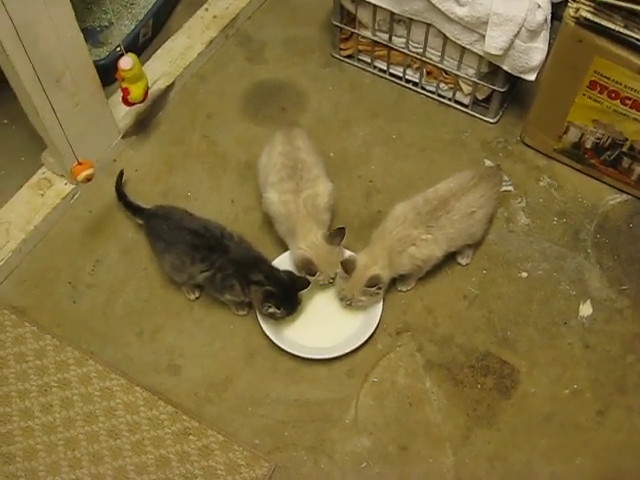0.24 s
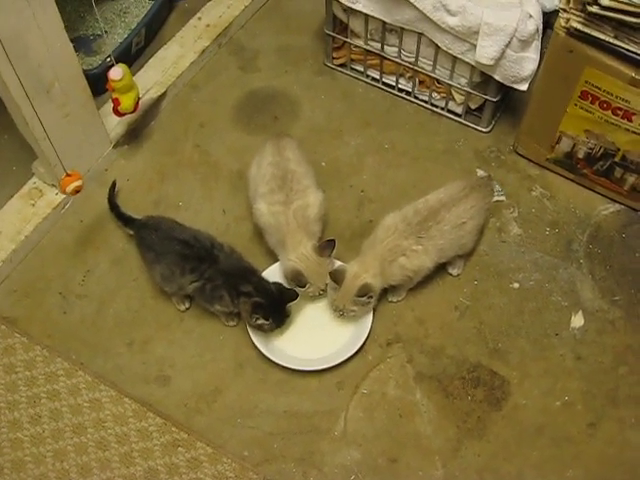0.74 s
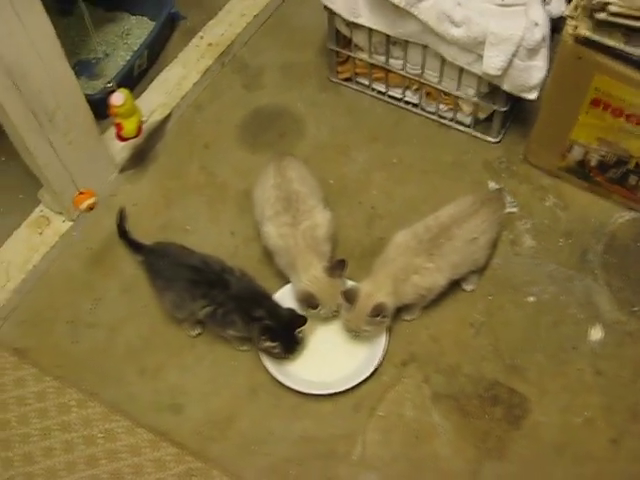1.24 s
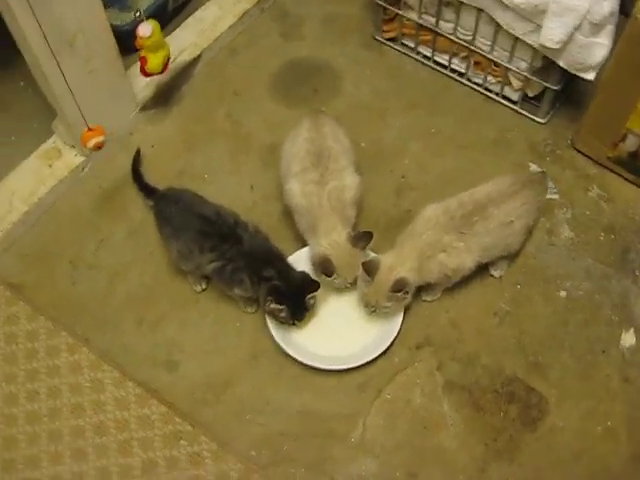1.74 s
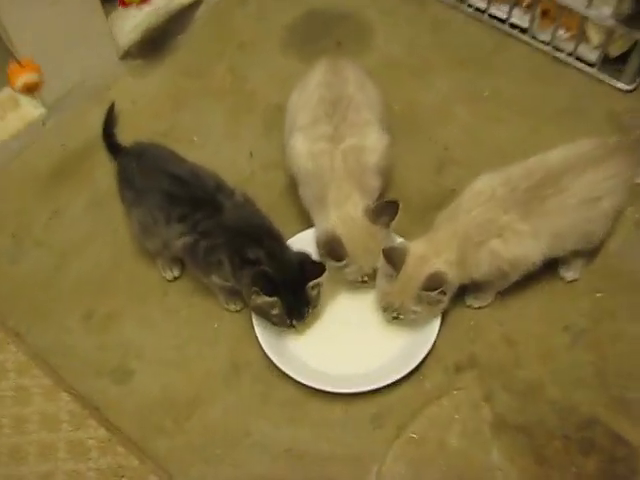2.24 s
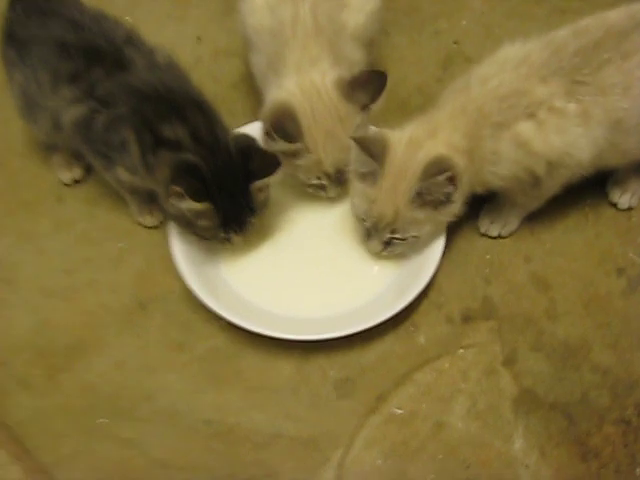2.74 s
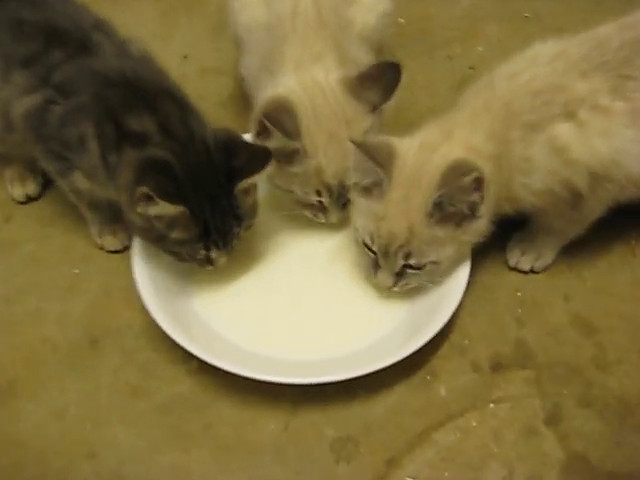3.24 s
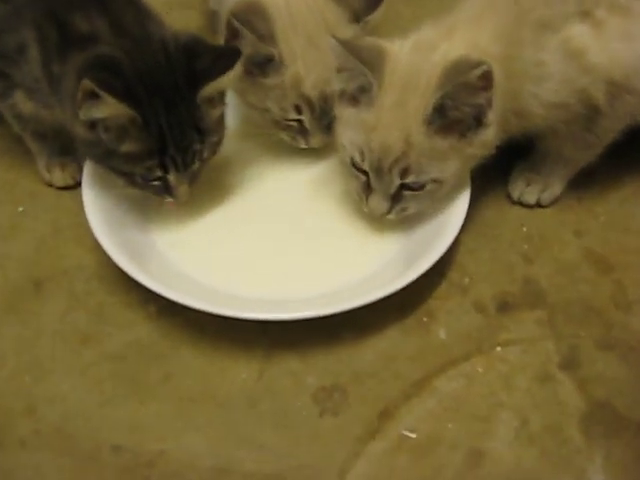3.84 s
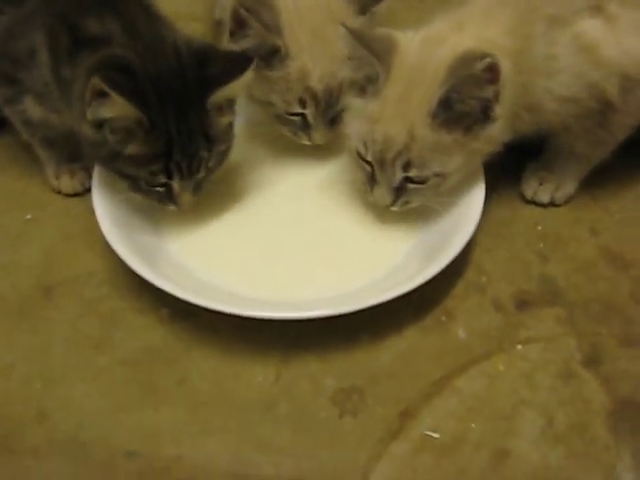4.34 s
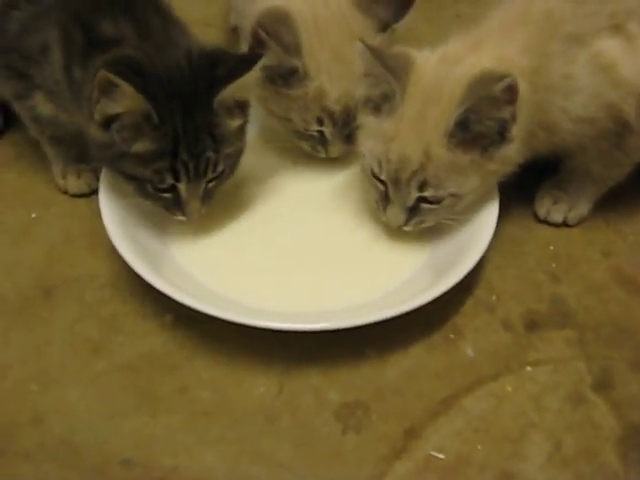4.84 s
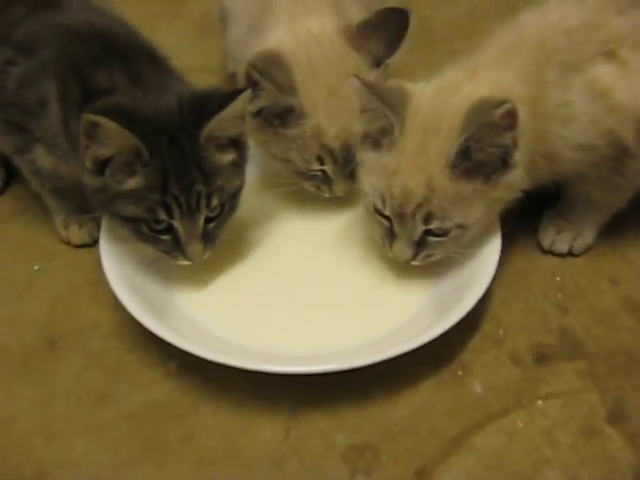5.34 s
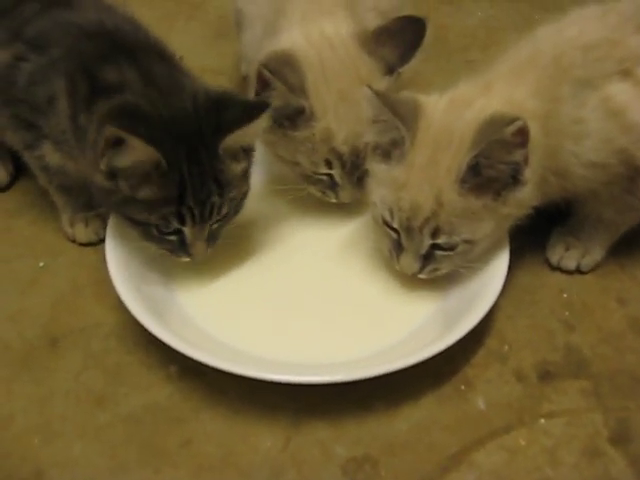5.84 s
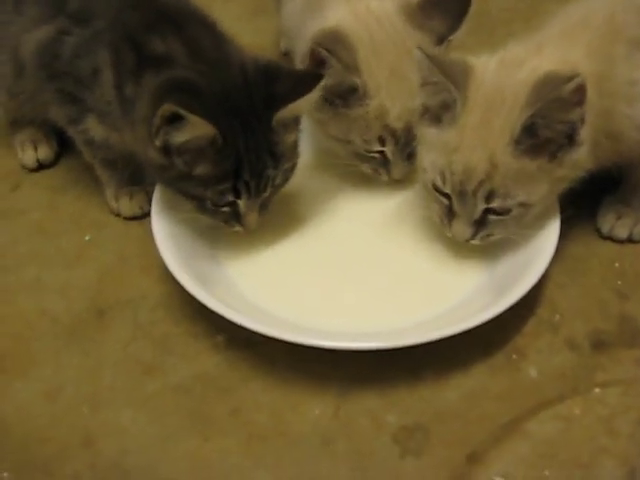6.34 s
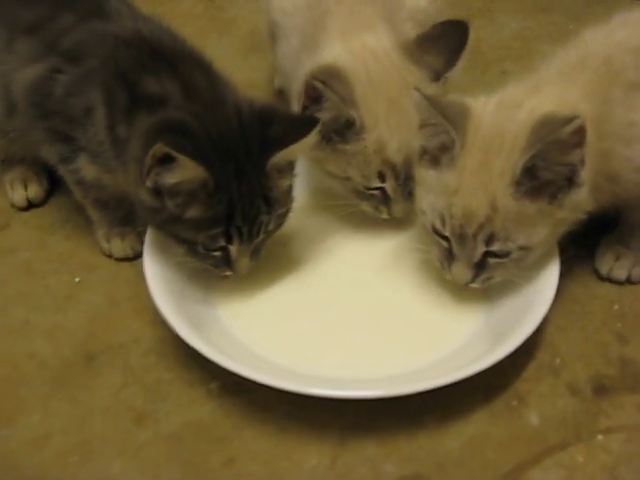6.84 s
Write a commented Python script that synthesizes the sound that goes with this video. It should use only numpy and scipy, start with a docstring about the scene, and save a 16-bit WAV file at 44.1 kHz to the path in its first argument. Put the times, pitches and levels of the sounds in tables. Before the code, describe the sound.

Kittens lap milk with quick, bright wet clicks and tiny plops, after a couple of seconds of nearby knocking, rubbing and scuffing in a quiet room.

```python
"""Three kittens lap milk from a plate on a concrete floor, their clear clicks starting after 2.3 s.
Each click snaps a film of milk and rings a pocket of air; squelches and bright ticks are runs of tiny pops.
Fine crackle swells from 2.1 to 3.3 s, then eases; soft plops follow its level.
In the first 2.5 s something nearby is knocked (noise bands and decaying modes) and rubbed (jerky noise).
A faint low sine dies away under the first knocks; filtered noise is the steady room hiss."""
import sys
import numpy as np
from scipy import signal
from scipy.fft import rfft, irfft
from scipy.io import wavfile
from scipy.ndimage import uniform_filter1d

SR = 44100
rng = np.random.default_rng(int(sys.argv[2]) if len(sys.argv) > 2 else 0)


def wrap_up_sound(samples):
    """Save the sound to the file named by the first command line argument, as 16-bit audio."""
    columns = np.atleast_2d(samples).T
    # keep every value between -1 and 1, then stretch to whole-number steps
    tamed = np.clip(columns, -1, 1)
    steps = np.round(tamed * 32767).astype(np.int16)
    wavfile.write(sys.argv[1], SR, steps)


N = 313110


def gain_of(db):
    """Decibels to gain."""
    return 10 ** (np.asarray(db) / 20)


def unit(x):
    """Scales to an energy of one."""
    return x / np.sqrt(np.sum(x ** 2) + 1e-20)


def read(points, hz):
    """Reads a (f/Hz, value) table on a log-frequency axis."""
    f_hz, value = np.transpose(points)
    return np.interp(np.log(hz + 1), np.log(f_hz + 1), value)


def curve(points):
    """A (t/s, value) table at every sample."""
    return np.interp(np.arange(N) / SR, *np.transpose(points))


def add(mix, s, sound):
    """Adds a sound into the mix at time s."""
    part = mix[max(round(s * SR), 0):][:len(sound)]
    part += sound[:len(part)]


def coloured(x, colour):
    """Filters by a table of (f/Hz, gain/dB)."""
    gain = gain_of(read(colour, np.fft.rfftfreq(N, 1 / SR)))
    return irfft(rfft(x) * gain, N)


def noise(colour):
    """Noise of rms one with the given spectrum."""
    return np.sqrt(N) * unit(coloured(rng.standard_normal(N), colour))


def decay_of(t, t60_s):
    """Exponential decay, 60 dB down at t60."""
    return np.exp(-np.log(1000) * t / t60_s)


def ring(hz, scale_ms, glide, size=512):
    """A pocket of air swells and rings for a few cycles, its pitch rising as it closes."""
    age = np.arange(size) / SR * 1000 / max(scale_ms, .05)
    pitch_hz = hz * (1 + glide * (np.tanh(age / 2) - .5))
    turns = np.cumsum(pitch_hz) / SR
    swell = age ** 2 * np.exp(-1.25 * age)
    return unit(swell * np.sin(2 * np.pi * (turns + rng.random())))


# room hiss colour: f/Hz, relative density/dB
HISS_COLOUR = [(15, -36), (25, -9), (134, -5.5), (236, -4), (363, -5), (394, -5.5), (607, -6.5),
               (1230, -8.5), (1520, -10), (1700, -8), (1840, -10), (3250, -12), (4370, -13), (12500, -22.5),
               (16000, -23.5)]


def room_hiss(level_db=-53):
    """Steady noise of the quiet room; the level is its rms."""
    return gain_of(level_db) * noise(HISS_COLOUR)


# dying low tone: t/s, f/Hz, rms level/dB
DRONE_PATH = [(0, 109, -52), (.05, 109, -49), (.12, 106, -60), (.18, 106, -53), (.3, 101, -75)]


def drone():
    """A faint low sine under the first knocks, gliding down as it dies away."""
    s, hz, db = np.transpose(DRONE_PATH)
    t = np.arange(N) / SR
    turns = np.cumsum(np.interp(t, s, hz)) / SR
    level = np.sqrt(2) * gain_of(np.interp(t, s, db)) * (t < s[-1])
    return level * np.sin(2 * np.pi * turns)


# rub swelling before the big knock, stirring again after it: t/s, level before trim/dB
RUB_LEVEL = [(0, -50.5), (.18, -46), (.29, -38.5), (.39, -44), (.5, -70), (.75, -51), (1.7, -76)]
# rub colour: f/Hz, relative density/dB
RUB_SPECTRUM = [(30, -31), (100, -13), (190, -15), (280, -5.5), (430, -12.5), (560, -3.5), (1150, -6),
                (1600, -15.5), (2500, -10.5), (3300, -20.5), (4100, -17.5), (5500, -23), (7000, -33),
                (15000, -43)]


def rub(grain_db=1.2, grain_s=0.0066, trim_db=-0.45):
    """Something slides, catching and letting go in small jerks."""
    grain = uniform_filter1d(rng.standard_normal(N), int(grain_s * SR))
    level_db = curve(RUB_LEVEL) + trim_db + grain_db * grain / grain.std()
    return gain_of(level_db) * noise(RUB_SPECTRUM)


# bands of a knock: lower edge/Hz, upper edge/Hz, t60/s, level re thump/dB
KNOCK_BANDS = [(84.4, 226, 0.22, 1), (297, 800, 0.23, -3), (720, 1780, 0.18, 1), (1860, 3470, 0.2, -6),
               (3840, 7600, 0.18, -18), (7660, 13000, 0.14, -40)]


def band_levels(ring_hz, clatter_db, treble_fall_db, thump_db, bass_fall_db=8.5):
    """Clatter falls per octave on both sides of its resonance; the thump fills in the bass."""
    lo, hi, _, share_db = np.transpose(KNOCK_BANDS)
    octaves = np.log2(np.sqrt(lo * hi) / ring_hz)
    fall_db = np.where(octaves > 0, treble_fall_db, bass_fall_db)
    hump_db = clatter_db - abs(octaves) * fall_db
    return 20 * np.log10(np.hypot(gain_of(hump_db), gain_of(thump_db + share_db)))


# knocks and scuffs: t/s, rise/ms, first contact re loudest band/dB, ring f/Hz,
# clatter before trim/dB, treble fall/(dB/octave), thump before trim/dB
KNOCK_EVENTS = [(.009, 0.56, -17, 5600, -10, 18, -14.5), (.073, 0.67, -10, 1230, 2, 11, -26),
                (.365, 0.62, -2, 2700, -15, 9, -26), (.399, 1.1, -5.5, 1060, 8.5, 10, 3),
                (.403, 2.3, -20, 635, 9, 20, -25), (.409, 3.2, -16, 4050, 3, 11.5, -10),
                (.646, 1.4, -22, 3400, -9, 7.5, -45), (.658, .7, -6, 3300, -18, 16, -34),
                (.783, 2.2, -16, 5800, 3, 24, -11.5), (.882, 1.8, -16, 3200, 1.5, 10.5, -27),
                (1.068, 0.71, 0, 1300, -36, 5, -27.5), (1.128, 1.6, -8, 2630, -15.5, 5, -24.5),
                (1.177, .9, 3, 3300, -20, 13, -34), (1.236, 3, -4, 3600, -15.5, 21, -43),
                (1.361, 0.41, -6.5, 3500, -13, 22, -27.5), (1.415, 3, -21, 1950, -1, 13, -25),
                (1.421, 3.5, -13, 1330, 1, 9.5, -13), (1.527, 3, -12, 1680, -11.5, 9.5, -29),
                (1.586, 2.9, -12, 4900, -10.5, 14, -48), (1.595, 1, -5, 4800, -15, 20, -49),
                (1.861, 1, -17, 3200, -19.5, 2, -47), (2.003, 3, -14, 6000, -23, 5, -31),
                (2.135, .6, 2.5, 3350, -20.5, 12, -42), (2.405, 0.36, -7, 3820, -10, 4.5, -26.5),
                (2.498, 1.3, -14, 3300, -12.5, 12, -52)]
# modes of the thing struck: f/Hz, relative level/dB, t60/s
STRUCK_MODES = [(86.4, -12, 0.7), (113.5, -14, 0.53), (146.8, -9, 0.355), (239.6, -4.5, 0.32),
                (285.6, 0.5, 0.17), (405, -32, 0.78), (545, 3.5, 0.086), (648, -2.5, 0.17), (686, -1, .15),
                (801, -1, 0.19), (1042, -0.5, 0.18), (1167, -1, 0.14), (1570, -7, 0.12), (1674, -15, 0.22)]


def knocks(modes_db=4, rattle_db=-2.0, ring_gain=1.13, ring_q=7, grain_db=3):
    """Sharp first contact, grainy clatter round one resonance, and low modes of the thing struck."""
    out, t = np.zeros(N), np.arange(SR * 3 // 4) / SR
    filters = [signal.butter(3, [lo, hi], "band", fs=SR, output="sos") for lo, hi, *_ in KNOCK_BANDS]
    grain_t = t[::100]
    for s, rise_ms, first_db, ring_hz, clatter_db, fall_db, thump_db in KNOCK_EVENTS:
        levels_db = band_levels(ring_hz, clatter_db, fall_db, thump_db)
        rise = 1 - np.exp(-t * 1000 / rise_ms)
        grain = np.interp(t, grain_t, rng.standard_normal(len(grain_t)))
        rattle = rng.standard_normal(len(t)) * gain_of(grain_db * grain)
        resonance = signal.lfilter(*signal.iirpeak(ring_hz, ring_q, fs=SR), rattle)
        rattle = rattle + ring_gain * resonance
        for k, (db, sos, (_, _, t60, _)) in enumerate(zip(levels_db, filters, KNOCK_BANDS)):
            # a different stretch of the rattle for each band
            shifted = np.roll(rattle, k * len(t) // len(KNOCK_BANDS))
            clatter = unit(signal.sosfilt(sos, shifted * rise * decay_of(t, t60)))
            add(out, s, gain_of(db + rattle_db) * clatter)
        # first contact: a very short swing at the resonance
        contact = ring(ring_hz, 210 / ring_hz, glide=0)
        add(out, s - .0005, gain_of(max(levels_db) + first_db) * contact)
        body = np.zeros(len(t))
        for hz, db, t60 in STRUCK_MODES:
            body += gain_of(db) * decay_of(t, t60) * np.sin(2 * np.pi * (hz * t + rng.random()))
        add(out, s, gain_of(thump_db + modes_db) * unit(body * rise))
    return out


# room decay: f/Hz, t60/s
ROOM_DECAY = [(200, 0.36), (1000, 0.16), (3500, 0.17), (7000, 0.074), (14000, 0.38)]


def room(x, floor_db=-19, tail_db=-9, onset_s=0.0064):
    """A few quick bounces off plate and floor, then a short diffuse tail."""
    t = np.arange(SR // 2) / SR
    hz, age, z = signal.stft(rng.standard_normal(len(t)), SR, nperseg=256)
    decay = decay_of(age, read(ROOM_DECAY, hz)[:, None])
    tail = signal.istft(z * decay, SR, nperseg=256)[1][:len(t)]
    response = gain_of(tail_db) * unit(tail * (1 - np.exp(-(t / onset_s) ** 2)))
    for s in rng.uniform(0.00094, .005, 4):
        add(response, s, gain_of([floor_db]) * rng.choice([-1, 1]))
    return x + signal.fftconvolve(x, response)[:N]


# mouth crackle, also steering the plops: t/s, base tick level/dB
CRACKLE_LEVEL = [(0, -41.5), (2.1, -43), (3.3, -34), (7.1, -37.5)]


def crackle(per_s=260, centre_hz=3800, octaves=0.692, spread_db=3.0, laps_per_s=3.4):
    """Fine ticks of three wet mouths, bunched on each kitten's own tongue rhythm."""
    out, level_db = np.zeros(N), curve(CRACKLE_LEVEL)
    duration_s = N / SR
    phases = rng.random(3)
    count = int(per_s * duration_s)
    for k, (when, scatter, pitch, size, damping) in enumerate(rng.random((count, 5))):
        kitten = k % 3
        rate = laps_per_s * (1 + .12 * (kitten - 1))
        stroke = np.floor(when * duration_s * rate) + phases[kitten]
        s = (stroke + .22 * rng.standard_normal()) / rate % duration_s
        # logistic pitch scatter, about bell-shaped in octaves
        bell = 0.588 * np.log(pitch / (1 - pitch))
        hz = np.clip(centre_hz * 2 ** (octaves * bell), 700, 10500)
        db = level_db[int(s * SR)] + spread_db * min(-np.log(size), 3.5)
        scale_ms = (0.15 + .3 * damping) * np.sqrt(centre_hz / hz)
        add(out, s, gain_of(db) * ring(hz, scale_ms, glide=0.37 * scatter))
    return out


def plops(per_s=30, centre_hz=900, level_db=-36, spread_db=2.0):
    """Tongues dipping into the milk open larger, softer pockets of air."""
    out = np.zeros(N)
    nearness_db = curve(CRACKLE_LEVEL) - np.max(np.transpose(CRACKLE_LEVEL)[1])
    for when, pitch, size, damping in rng.random((int(per_s * N / SR), 4)):
        db = level_db + nearness_db[int(when * N)] + spread_db * min(-np.log(size), 3)
        plop = ring(centre_hz * 2 ** (pitch - .5), 0.61 + .6 * damping, glide=0.18)
        add(out, when * N / SR, gain_of(db) * plop)
    return out


# wet squelches and brief bright ticks: t/s, dry energy/dB, centre f/Hz, length/ms
POP_RUNS = [(.353, -27, 10000, 1.9), (.366, -22, 9000, 4), (0.658, -15, 4410, 3.7), (1.594, -14, 5440, 5.5),
            (2.585, -28.5, 980, 12), (2.747, -24, 1130, 10), (2.863, -22.5, 1250, 18),
            (2.951, -10.5, 6000, 9), (3.86, -20, 3420, 24), (3.868, -26, 6550, 17),
            (3.8775, -9.5, 4450, 5.9), (5.5674, -5, 5020, 3.6), (5.745, -19, 4500, 12),
            (5.794, -25, 4080, 4), (5.9238, -21.5, 3040, 3), (6.3855, -17.5, 3200, 6),
            (6.929, -18, 3500, 9.9)]


def squelches_and_ticks(pops_per_ms=2.3, spread_octaves=0.63, spread_db=4):
    """Wet squelches and brief bright ticks: fast runs of tiny pops."""
    out = np.zeros(N)
    for s, db, hz, length_ms in POP_RUNS:
        run = np.zeros(SR // 20)
        count = int(length_ms * pops_per_ms) + 1
        for k, (late, pitch, size) in enumerate(rng.uniform(-1.2, 1, (count, 3))):
            at_s = (k + .5 * late) / pops_per_ms / 1000
            pop_hz = min(hz * 2 ** (spread_octaves * pitch), SR / 3)
            add(run, at_s, gain_of(spread_db * size) * ring(pop_hz, 1100 / hz, glide=0.11))
        add(out, s, gain_of(db) * unit(run))
    return out


def snap(hz, octaves, spread_ms, size=512):
    """A film of milk breaks: a very short spray of pressure with a broad hump of a spectrum."""
    age = np.arange(size) * 1000 / SR / spread_ms
    spray = rfft(rng.standard_normal(size) * age * np.exp(-age))
    offset = np.log2((np.fft.rfftfreq(size, 1 / SR) + 1) / hz)
    hump = np.exp(-.5 * (offset / octaves) ** 2)
    # the spray's own spectrum is half flattened
    flattened = spray / np.sqrt(np.abs(spray) + 1e-9)
    return unit(np.roll(irfft(hump * flattened), 10))


# clearest tongue clicks: t/s, dry ring energy/dB, air pocket f/Hz, dry snap energy/dB, snap centre f/Hz
TONGUE_CLICKS = [(2.3416, -24, 2360, -20.5, 2900.0), (2.438, -33, 5510.0, -21.5, 5440),
                 (2.4981, -15, 3010.0, -15.5, 4810), (2.509, -14, 2930.0, -23, 3000.0),
                 (2.587, -28, 1050.0, -30.0, 3000.0), (2.7124, -27, 2690.0, -21, 4430),
                 (2.7583, -23, 4920.0, -21.5, 3380), (2.8605, -18, 1720, -21, 1500.0),
                 (2.882, -23, 2950, -19.5, 4200.0), (2.9637, -19.0, 8990.0, -13.5, 4700.0),
                 (2.9986, -21.0, 2760.0, -35, 3100.0), (3.042, -26, 2700, -28.0, 3700.0),
                 (3.1096, -20, 4300, -29, 4200.0), (3.1275, -9.5, 3770, -15.0, 3100.0),
                 (3.1817, -27, 2990.0, -26.0, 3700.0), (3.229, -22.5, 2500.0, -33.0, 3300.0),
                 (3.2681, -10.5, 1890, -17, 2380), (3.2794, -30, 2610.0, -20, 3200.0),
                 (3.3032, -25, 3380.0, -22.0, 2900.0), (3.3137, -16.5, 2660, -15.5, 2400.0),
                 (3.3766, -14.5, 3830, -23.0, 4300.0), (3.4246, -16.5, 3000, -17, 3850),
                 (3.4448, -22, 3790.0, -21, 4300.0), (3.528, -12.5, 6950, -21.0, 5630),
                 (3.6517, -19, 5840.0, -23, 4100.0), (3.6798, -23, 5210.0, -25, 4170),
                 (3.7265, -19, 1450, -29, 1500.0), (3.741, -24, 3010.0, -23.0, 2100.0),
                 (3.8299, -27, 3730, -20.5, 3000.0), (3.867, -22.5, 3080, -20, 3630),
                 (3.92, -14, 3910, -34, 3800.0), (3.9742, -24.5, 1010.0, -40, 1700.0),
                 (3.9888, -14, 5300, -17.5, 4220), (4.0056, -23, 7140.0, -20, 4400.0),
                 (4.0605, -22.5, 2750, -22, 5500.0), (4.0917, -15.5, 3820, -18.5, 4670),
                 (4.1633, -13, 4700, -25, 4500.0), (4.1736, -28, 1960.0, -16.5, 1690),
                 (4.3361, -5.5, 4700, -13, 4600.0), (4.3987, -26, 1150, -22, 2500.0),
                 (4.448, -12.5, 1980, -14, 2510), (4.4841, -20, 3730, -16.5, 6460),
                 (4.655, -24, 3990.0, -25, 3300.0), (4.7268, -23, 3580.0, -22, 5800.0),
                 (4.8357, -23, 7250, -24, 6300.0), (4.8653, -21, 2580, -24, 4400.0),
                 (4.9142, -26.5, 1120.0, -26, 2000.0), (4.9185, -15.5, 5660, -20, 3980),
                 (4.9824, -17, 5510.0, -29, 5100.0), (4.9963, -17.5, 5060.0, -24, 6300.0),
                 (5.0459, -18.5, 6940.0, -36, 5800.0), (5.0998, -20, 4020.0, -28, 4100.0),
                 (5.1574, -15.0, 4510.0, -26, 4600.0), (5.168, -24, 9530.0, -23, 5100.0),
                 (5.177, -22, 6940.0, -14.5, 6600.0), (5.2005, -11.5, 5100, -16, 4800.0),
                 (5.2126, -18.5, 2690.0, -16.0, 4400.0), (5.2997, -21.5, 3010.0, -30.0, 2900.0),
                 (5.3123, -18, 4780.0, -17.5, 5100.0), (5.3291, -18.5, 3500, -20.5, 5800.0),
                 (5.412, -25.5, 920, -32, 3000.0), (5.415, -15.5, 4480, -27, 4000.0),
                 (5.4289, -24, 4640.0, -21, 4000.0), (5.4888, -25, 1860.0, -26.0, 3000.0),
                 (5.518, -15.5, 5960, -16.5, 5400.0), (5.5258, -13.5, 3040, -12, 4570),
                 (5.5761, -17, 3600, -29, 4900.0), (5.6717, -16.5, 5840.0, -19, 3900.0),
                 (5.754, -14.5, 4720, -13.5, 5160), (5.802, -12, 4100, -23, 4400.0),
                 (5.9268, -25, 8990.0, -16.5, 4800.0), (5.9951, -15.5, 4470, -16.5, 4470),
                 (6.0089, -26, 1180, -27, 2400.0), (6.107, -19, 4640.0, -26, 3700.0),
                 (6.1599, -20, 3900.0, -22.5, 4500.0), (6.2221, -30, 2090.0, -21.5, 3900.0),
                 (6.305, -20, 5840.0, -25, 2800.0), (6.315, -21.5, 4100, -30, 5100.0),
                 (6.3648, -24.0, 4020.0, -32, 3600.0), (6.3902, -14.5, 6940.0, -13, 4200.0),
                 (6.3981, -15.5, 3480, -22.0, 3500.0), (6.5044, -18.5, 5540, -21, 2900.0),
                 (6.576, -24.5, 3300, -23.5, 5200.0), (6.6093, -14, 5000, -20, 4400.0),
                 (6.7099, -14, 6250, -15.5, 4030), (6.8315, -9.5, 4080, -29, 3800.0),
                 (6.9689, -24.5, 1010.0, -31, 2100.0), (7.0598, -22.5, 4200, -21.5, 3600.0)]


def laps(ring_cycles=1.23, scatter_octaves=0.37, longest_ms=0.33, lead_db=-14.0, lead_s=0.001203,
         linger_db=-9.5, linger_ms=1.6, linger_hz=2050, linger_tilt_db=9,
         pop_db=-11.5, pop_octaves=0.51, pop_before_s=0.0059, pop_after_s=.011):
    """A soft weaker burst leads into each snap and the ring it starts, among three weaker pops."""
    out = np.zeros(N)
    chances = rng.uniform(-1, 1, (len(TONGUE_CLICKS), 7))
    for (s, ring_db, hz, snap_db, snap_hz), chance in zip(TONGUE_CLICKS, chances):
        cycles = ring_cycles * 2 ** (scatter_octaves * chance[0])
        scale_ms = min(1000 * cycles / hz, longest_ms)
        lead = snap(snap_hz, octaves=0.55, spread_ms=0.64)
        add(out, s - lead_s, gain_of(max(snap_db, ring_db) + lead_db) * lead)
        add(out, s - .0002, gain_of(snap_db) * snap(snap_hz, octaves=0.78, spread_ms=0.23))
        add(out, s - .0002, gain_of(ring_db) * ring(hz, scale_ms, glide=0.027))
        # middle-sized pockets stay whole and ring on as a plop
        held_db = linger_db - linger_tilt_db * abs(np.log2(hz / linger_hz))
        add(out, s, gain_of(ring_db + held_db) * ring(hz, linger_ms, glide=0.04))
        for late, pitch in chance[1:].reshape(3, 2):
            pop_hz = np.sqrt(hz * snap_hz) * 2 ** (pop_octaves * pitch)
            pop = ring(pop_hz, scale_ms, glide=0.04)
            delay_s = np.interp(late, [-1, 1], [-pop_before_s, pop_after_s])
            add(out, s + delay_s, gain_of((ring_db + snap_db) / 2 + pop_db) * pop)
    return out


# spectral shading of all mouth sounds: f/Hz, gain/dB
MOUTH_COLOUR = [(500, 5), (5000, -1.34), (9500, 1), (12500, 3), (16000, -9)]


def scene():
    """Kittens in the room, over the knocks, the rub, the low tone and the hiss."""
    mouths = laps() + squelches_and_ticks() + crackle() + plops()
    kittens = room(coloured(mouths, MOUTH_COLOUR))
    return (kittens + knocks() + drone() + rub() + room_hiss())[None]


def record(dry, edge_hz=16000):
    """Linear-phase low-pass that limits the treble."""
    lowpass = signal.firwin(511, edge_hz, window=("kaiser", 9), fs=SR)
    return signal.oaconvolve(dry, lowpass[None], "same")


dry = scene()
out = record(dry)
wrap_up_sound(out)
```